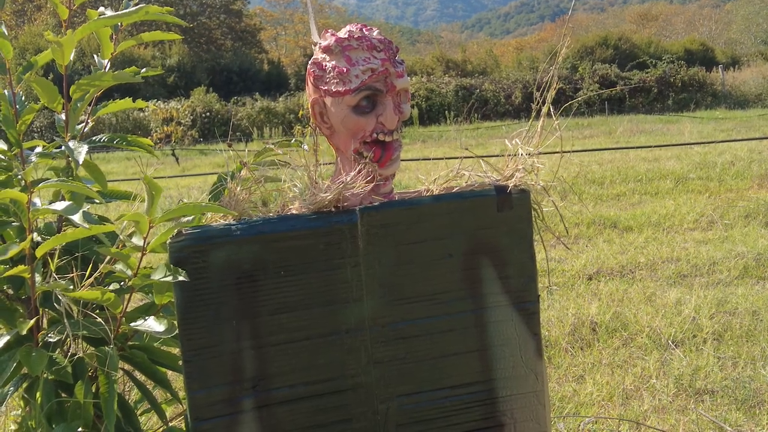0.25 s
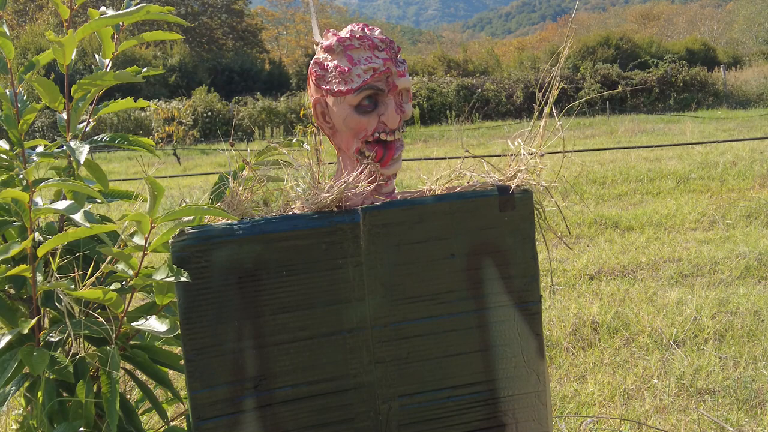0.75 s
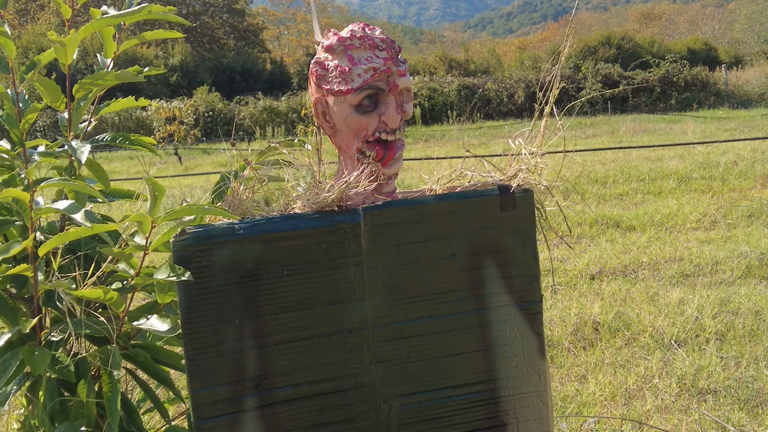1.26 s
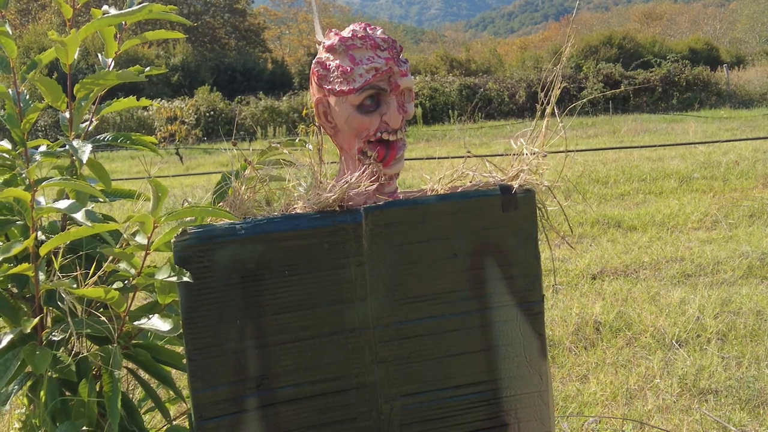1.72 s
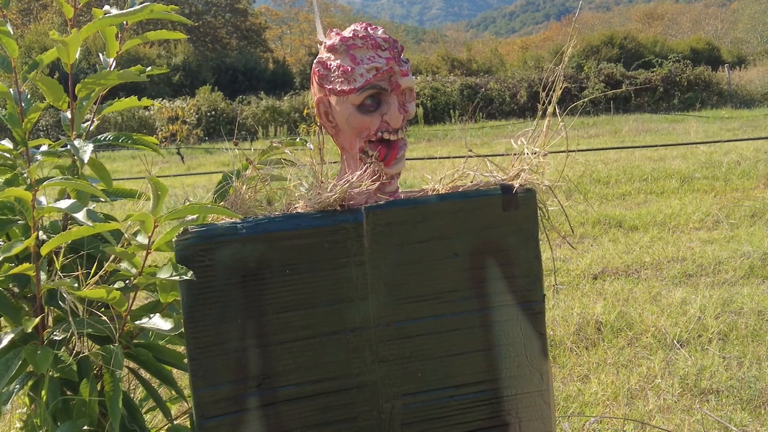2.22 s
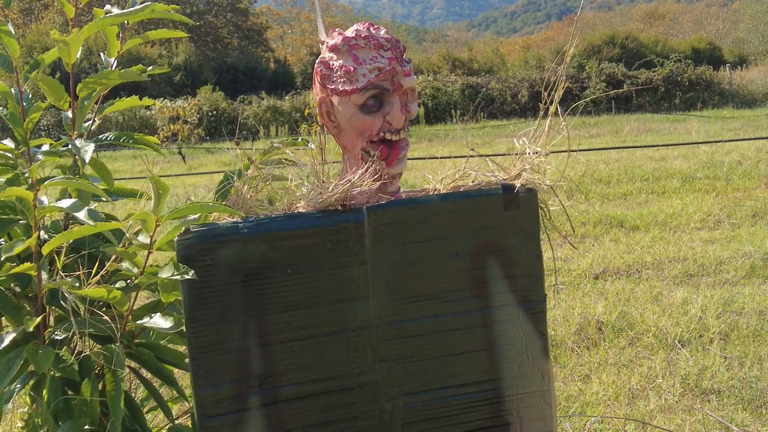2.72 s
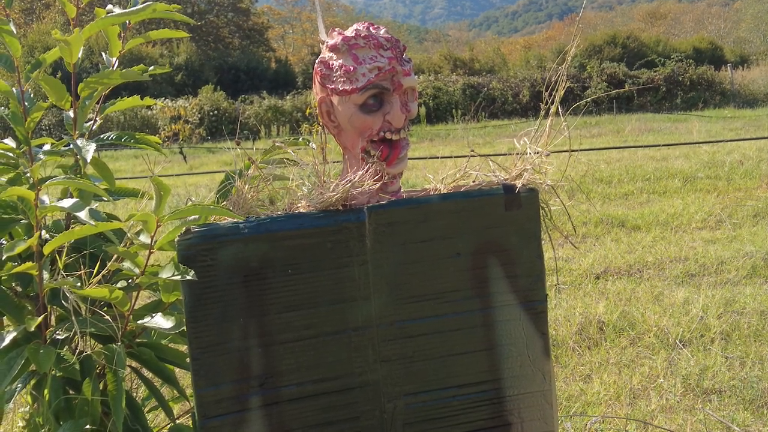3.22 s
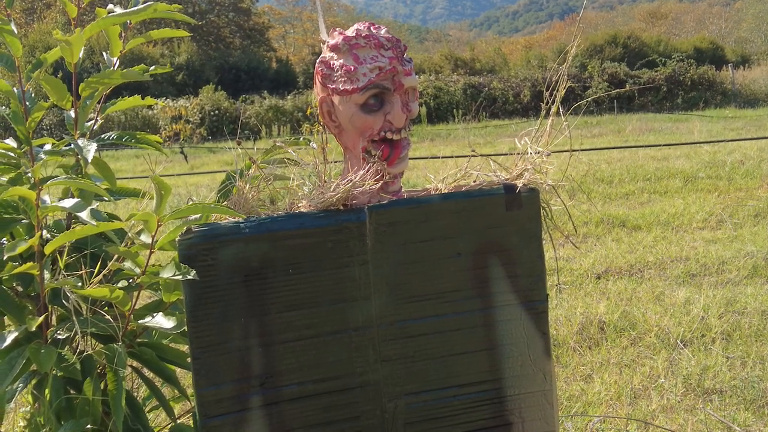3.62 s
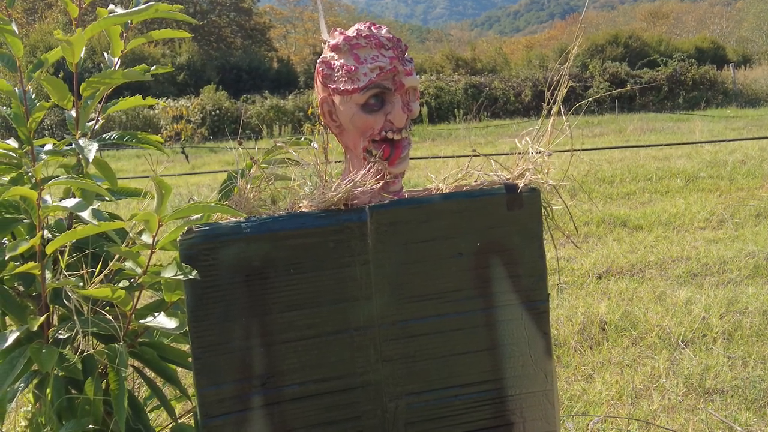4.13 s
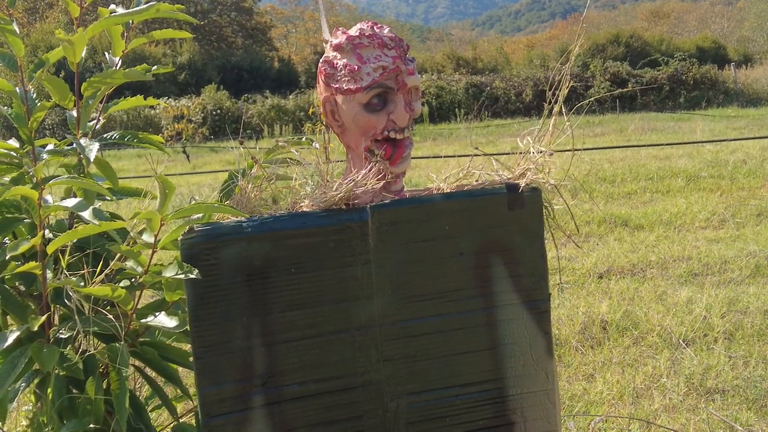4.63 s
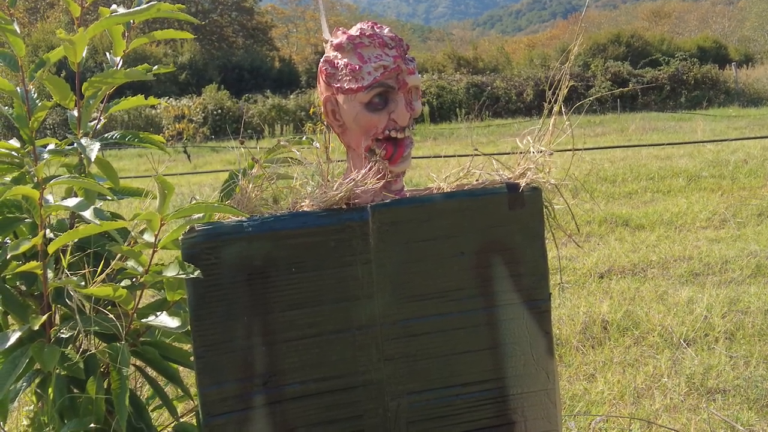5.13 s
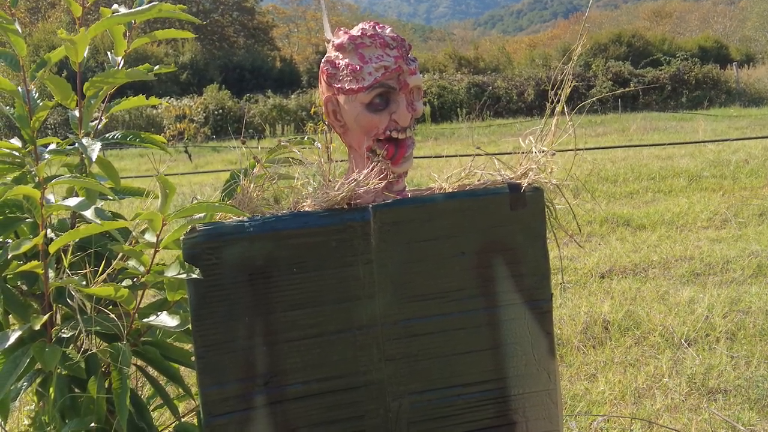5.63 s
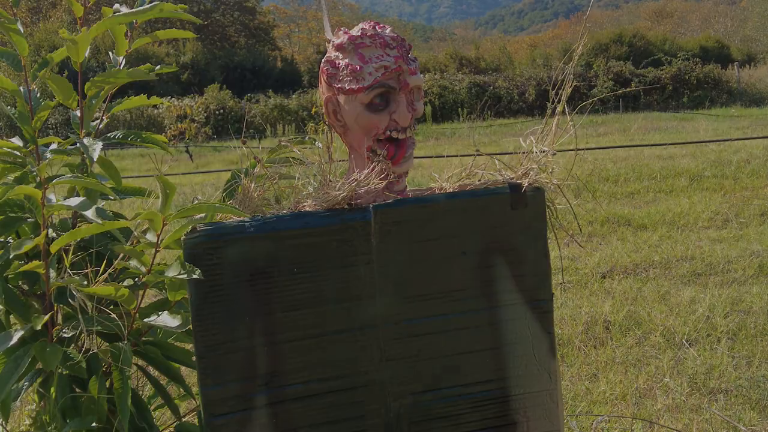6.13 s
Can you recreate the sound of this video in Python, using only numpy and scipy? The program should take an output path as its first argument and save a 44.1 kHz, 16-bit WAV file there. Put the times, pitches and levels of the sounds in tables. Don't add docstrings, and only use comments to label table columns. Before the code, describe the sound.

Close to the microphone, a gas air pistol fires five clipped, hard cracks a little over a second apart. Each is followed almost at once by a pellet snapping on a board, then a bright hedge echo and a duller hillside echo. Small metallic trigger clicks come about two thirds of a second after each blast. Gas buffets the right side after the first and last shots. Faint breeze, leaves and distant machine hum fade out at the end.

```python
import sys
import numpy as np
from scipy import signal
from scipy.fft import rfft, irfft
from scipy.io import wavfile
from scipy.ndimage import uniform_filter1d

SR = 44100
rng = np.random.default_rng(int(sys.argv[2]) if len(sys.argv) > 2 else 0)


def materialize(psi):
    bounded = np.clip(np.atleast_2d(psi).T, -1, 1)
    quanta = np.round(bounded * 32767).astype(np.int16)
    wavfile.write(sys.argv[1], SR, quanta)


def attenuation_scalar(level_db):
    decades = np.asarray(level_db, float) / 20
    return 10 ** decades


N = 280476

# (time [s], gas push length [ms], lead of the smear ahead of the front [s])
SHOT_TIMES = [
    (.1031, 2.0, .025),
    (1.4487, 1.8, .03),
    (2.6106, 1.95, .036),
    (3.7669, 1.95, .041),
    (5.1055, 2.0, .034),
]
# (frequency [Hz], density [dB per Hz])
JET_SPECTRUM = [(350, -32.5), (600, -3.5), (803, -4.5), (1100, 1), (2090, -18), (2400, -12.5), (3000, 2.5),
                (3790, -7.5), (5150, 7), (7280, -11), (9340, -4.5), (10600, -13), (13800, -3), (15300, -7),
                (16300, -32)]


def evened(x):
    return x / np.sqrt(np.mean(x ** 2) + 1e-20)


def read(points, hz):
    f, value = np.transpose(points)
    return np.interp(np.log(hz + 1), np.log(f + 1), value)


def add(mix, s, sound):
    part = mix[:, round(s * SR):][:, :sound.shape[-1]]
    part += sound[..., :part.shape[1]]


def resonate(x, hz, width):
    b, a = signal.iirpeak(hz, hz / width, SR)
    return signal.lfilter(b, a, x)


def alike(a, b, same):
    same = np.clip(same, -1, 1)
    return np.array([a, same * a + np.sqrt(1 - same ** 2) * b])


def pair(size, same):
    a, b = rng.standard_normal((2, size))
    return alike(a, b, same)


def coloured(x, spectrum):
    hz = np.fft.rfftfreq(x.shape[1], 1 / SR)
    return evened(irfft(rfft(x) * attenuation_scalar(read(spectrum, hz)), x.shape[1]))


def swells(rows, t):
    s, db, rise, t60 = np.transpose(rows)[:, :, None]
    steps = t[::32]
    rising = 30 * np.maximum(s - steps, 0) / rise
    dying = 60 * np.maximum(steps - s, 0) / t60
    power = attenuation_scalar(db - rising - dying) ** 2
    return np.interp(t, steps, np.sqrt(power.sum(0)))


def air_hiss():
    # (frequency [Hz], density [dB per Hz])
    air_spectrum = [(65, -26.5), (110, -6), (229, -10), (289, -12.5), (363, -9.5), (519, -11.5), (564, -13),
                    (877, -10), (933, -9.5), (1330, -7.5), (1790, -12), (2720, -18.5), (8440, -21),
                    (14200, -21), (16500, -21)]
    # (frequency [Hz], left-right likeness [-])
    likeness = [(60, 0.71), (130, -1.6), (290, 0.96), (640, -1.4), (1410, 0.12), (3100, 0.95), (6820, -0.4),
                (15000, 0.32)]
    hz = np.fft.rfftfreq(N, 1 / SR)
    a, b = rfft(rng.standard_normal((2, N)))
    both = alike(a, b, read(likeness, hz))
    return attenuation_scalar(-68) * evened(irfft(both * attenuation_scalar(read(air_spectrum, hz)), N))


def far_machine():
    # (centre [Hz], width [Hz], level [dB])
    hum = (572, 9, -76)
    # (centre [Hz], width [Hz], level [dB])
    drone = (79, 14, -65.5)
    hz, width, db = drone
    low = resonate(resonate(pair(N, same=1.0), hz, width), hz, width)
    out = attenuation_scalar(hum[2]) * evened(resonate(pair(N, same=0.17), *hum[:2]))
    out += attenuation_scalar(db) * evened(low)
    out += attenuation_scalar(db + 3.0) * evened(resonate(pair(N, same=0.96), hz / 2, width))
    return out


def leaves(t):
    # (peak time [s], level [dB], rise [s], t60 [s])
    rustle = [
        (.42, -67, .2, 6.3),
        (1.8, -73, .8, 3),
        (5.45, -67.5, .3, 6),
    ]
    lumps = evened(uniform_filter1d(rng.standard_normal(N), 900))
    rub = resonate(resonate(pair(N, same=0.49), 550, 700), 460, 900)
    calm_db = -82.5
    return np.hypot(attenuation_scalar(calm_db), swells(rustle, t)) * attenuation_scalar(2.2 * lumps) * evened(rub)


def breeze(t):
    # (frequency [Hz], density [dB per Hz])
    rumble = [(7.1, -37.5), (12, 1.5), (27, 3), (43, -3), (60, -15), (87, -13), (102, -22), (129, -24.5),
              (200, -28.5), (260, -62.5), (440, -120)]
    # (peak time [s], level [dB], rise [s], t60 [s])
    gusts = [
        (.14, -35.5, .1, 0.13),
        (.35, -47, .2, 1.63),
        (1.45, -48, .15, .6),
        (1.66, -52, .2, 5),
        (2.36, -52.5, .3, 3.4),
        (2.68, -49, .15, 3),
        (5.15, -40.5, .2, .8),
        (5.24, -36, .08, .25),
    ]
    calm_db = -57
    return np.hypot(attenuation_scalar(calm_db), swells(gusts, t)) * coloured(pair(N, same=1.0), rumble)


def ducking(t):
    # (gain change [dB], hold [s])
    duck = (-2.2, 0.059)
    since = t - np.array(SHOT_TIMES)[:, :1]
    held = (since > 0) * np.clip(2 - since / duck[1], 0, 1)
    return attenuation_scalar(duck[0] * held.sum(0))


def field():
    t = np.arange(N) / SR
    return (air_hiss() + leaves(t) + far_machine()) * ducking(t) + breeze(t)


def echoes():
    # (frequency [Hz], density [dB per Hz])
    hedge_spectrum = [(410, -50.5), (700, -20), (1170, -17.5), (1810, -9), (2460, -4.5), (3700, -9),
                      (4170, 0.5), (4460, -3.5), (5810, -3), (6890, -12.5), (7560, -5), (9400, -7),
                      (10400, -14), (15200, -14), (16500, -33)]
    # (frequency [Hz], density [dB per Hz])
    slope_spectrum = [(290, -40), (500, -20.5), (745, -7.5), (959, -13), (1140, -7), (1270, 0), (1450, -4),
                      (2470, -4), (2670, -8.5), (3010, -2.5), (3770, -7.5), (5400, -8.5), (6960, -19.5),
                      (7840, -16.5), (12000, -27), (15600, -55.5), (22000, -120)]
    # (delay after the shot [s], level [dB], rise [s], t60 [s])
    hedge_returns = [(.004, -41, .003, 0.17), (.05, -56, .03, 1.2), (.09, -54, .02, .12),
                     (.149, -40.5, .03, .065), (.175, -52.5, .06, .4), (.292, -65.5, 0.017, 1)]
    # (delay after the shot [s], level [dB], rise [s], t60 [s])
    slope_returns = [(.03, -70, 0.033, 0.33), (.163, -52.5, 0.052, 0.74), (.292, -52, 0.034, 1.16),
                     (.55, -65, 0.26, 2.7)]
    # (hedge level [dB], slope level [dB])
    shot_levels = [(-6, 1.5), (0, 0.5), (-0.5, -1.5), (1, -2), (-6, -2)]
    t = np.arange(0, 1.1, 1 / SR)
    out = np.zeros((2, N))
    for row, (near_db, far_db) in zip(SHOT_TIMES, shot_levels):
        grain = evened(uniform_filter1d(rng.standard_normal((2, len(t))), 90))
        stems = (rng.random(len(t)) < 45 / SR) * rng.exponential(1, len(t))
        stems = uniform_filter1d(stems, 60) * 60
        near_db = near_db + 1.3 * np.minimum(stems, 2.5)
        hedge = swells(hedge_returns, t) * attenuation_scalar(near_db + 2.8 * grain[0])
        hedge = hedge * coloured(pair(len(t), same=0.23), hedge_spectrum)
        slope = swells(slope_returns, t) * attenuation_scalar(far_db + 1.6 * grain[1])
        slope = slope * coloured(pair(len(t), same=0.3), slope_spectrum)
        add(out, row[0], (hedge + slope) * (t > .003))
    return out


def thud(db, hz, t60):
    t = np.arange(0, .1, 1 / SR)
    return attenuation_scalar(db - 60 * t / t60) * np.clip(t / 0.013, 0, 1) * np.sin(2 * np.pi * hz * t)


def add_thuds(mix):
    # (time [s], peak [dB], pitch [Hz], t60 [s])
    thuds = [
        (.578, -44, 422, 0.057),
        (1.594, -44, 130, 0.097),
        (1.594, -27.5, 360, 0.019),
        (2.755, -46.5, 212, 0.055),
        (3.912, -47, 261, 0.035),
        (5.51, -55.5, 225, 0.12),
        (5.77, -45, 197, 0.056),
    ]
    for s, *settings in thuds:
        add(mix, s, thud(*settings))


def click(db, bright_db, t60, bounce, rise):
    # (centre [Hz], width [Hz], level [dB])
    steel = [(1570, 1600, 2), (2350, 680, 0.5), (3070, 230, 8), (4050, 570, 0.5)]
    # (centre [Hz], width [Hz], level [dB])
    small_parts = [(6250, 1700, 0), (7470, 360, 5), (8880, 690, 6), (13000, 1600, -1)]
    t = np.arange(0, .08, 1 / SR)
    knock = attenuation_scalar(-60 * t / 0.0084)
    rattle = knock + bounce * np.roll(knock, 175) + attenuation_scalar(-8 - 60 * t / t60)
    drive = pair(len(t), same=0.71) * rattle * np.clip(t / rise, 0, 1)
    frame = sum(attenuation_scalar(level) * resonate(drive, hz, width) for hz, width, level in steel)
    no_bass = signal.butter(4, 1450, "high", fs=SR, output="sos")
    frame = signal.sosfilt(no_bass, frame)
    frame += 11.0 * bounce * resonate(drive, 2870, 130)
    parts = sum(attenuation_scalar(level) * resonate(drive, hz, width) for hz, width, level in small_parts)

    def by_attack(x):
        return x / np.sqrt(np.mean(x[:, :130] ** 2))

    return attenuation_scalar(db) * (by_attack(frame) + attenuation_scalar(bright_db) * by_attack(parts))


def add_trigger_parts(mix):
    # (time [s], peak [dB])
    ticks = [(.6888, -57), (.9433, -57), (1.9574, -55), (1.9779, -61), (2.1665, -57), (3.1083, -54),
             (3.3209, -59.5), (4.2597, -54.5), (4.4842, -58), (5.8022, -59), (5.8272, -56), (6.0132, -63)]
    springs = [(.7462, -49.5), (2.0023, -51), (3.1338, -58), (4.2857, -54), (4.3091, -49.5),
               (5.8506, -50.5)]
    pawls = [(.7594, -51), (2.0118, -48.5), (3.1474, -57), (4.3244, -56), (5.8611, -47.5)]
    sears = [(.7806, -40), (2.0333, -37.5), (3.1712, -40), (4.3395, -57), (4.3487, -53), (5.881, -39)]
    latches = [(.829, -33), (2.0872, -43.5), (3.225, -33.5), (4.389, -33), (5.9389, -33.5)]
    # (bright share [dB], t60 [s], bounce share [-], rise [s])
    tick_voice = (-20, .024, 0.24, .001)
    spring_voice = (-3.5, 0.063, 0.15, .0015)
    pawl_voice = (-13, 0.1, 0.16, .002)
    sear_voice = (6, .045, .08, .0002)
    latch_voice = (-12, 0.053, .35, .0001)
    for events, voice in ((ticks, tick_voice), (springs, spring_voice), (pawls, pawl_voice),
                          (sears, sear_voice), (latches, latch_voice)):
        for s, db in events:
            add(mix, s, click(db, *voice))


def spike(t, ms):
    u = np.maximum(t, 0) * 1000 / ms
    return -2 * np.e * u * (1 - u / 2) * np.exp(-u)


def strike(db, knock_db):
    # (frequency [Hz], level [dB], t60 [s])
    board = [(500, -7.5, 0.03), (950, -7.5, 0.0045), (2490, -14, .01), (5400, -4.5, 0.0027),
             (7800, 4.5, 0.0024)]
    t = np.arange(0, .06, 1 / SR)
    rings = []
    for hz, level, t60 in board:
        hz = hz * rng.uniform(0.76, 1.5)
        rings.append(attenuation_scalar(level - 60 * t / t60) * np.sin(2 * np.pi * hz * t))
    direct = .6 * spike(t, 0.091) - 1.5 * sum(rings[2:]) - attenuation_scalar(knock_db) * sum(rings[:2])
    softened = uniform_filter1d(direct, 14)
    bounced = direct + sum(.4 ** k * np.roll(softened, 180 * k) for k in range(1, 5))
    splat = attenuation_scalar(-5 - 60 * t / .006)
    scatter = attenuation_scalar(-20 - 60 * t / 0.013)
    debris = (splat + scatter) * coloured(pair(len(t), same=0.58), JET_SPECTRUM)
    shudder = evened(resonate(pair(len(t), same=.9), 450, 730))
    debris += attenuation_scalar(knock_db - 10 - 60 * t / .075) * shudder
    return attenuation_scalar(db) * (bounced + debris)


def add_strikes(mix):
    # (time [s], peak [dB], knock under the snap [dB])
    strikes = [
        (.1284, -22.5, -3),
        (1.4737, -15.5, -9),
        (2.6368, -20, -4.5),
        (3.7933, -21.5, -8),
        (5.1314, -17, -6),
    ]
    for s, *settings in strikes:
        add(mix, s, strike(*settings))


def spent_gas():
    # (time [s], half length [s], left pressure [full scale], right pressure [full scale])
    eddies = [(0.137, 0.028, -0.032, -0.18), (0.183, 0.069, -.005, -.09), (.205, .02, 0.0063, -0.095),
              (.233, 0.012, 0, .14), (0.263, .016, 0, 0.32), (0.281, 0.0095, -0.0028, -0.092),
              (5.129, 0.046, -0.035, -0.12), (5.222, 0.11, -0.034, -0.084), (5.258, 0.033, 0.013, -0.073),
              (5.301, 0.044, .02, 0.24), (5.35, 0.065, 0.073, 0.085)]
    # (start [s], end [s], level [dB])
    flutters = [
        (.13, 0.299, -43.5),
        (5.135, 5.398, -42.5),
    ]
    out = np.zeros((2, N))
    for s, half, left, right in eddies:
        add(out, s - half, np.outer([left, right], np.hanning(round(2 * half * SR))))
    for start, end, db in flutters:
        passing = signal.windows.tukey(round((end - start) * SR), .15)
        flutter = resonate(resonate(rng.standard_normal(SR // 2), 51, 60), 51, 60)
        flutter = evened(flutter)[-len(passing):]
        add(out, start, np.outer([.15, 1], attenuation_scalar(db) * passing * flutter))
    return out


def jet_noise(t, push, crack_db, swirl_db):
    jet = attenuation_scalar(-60 * t / .012) + attenuation_scalar(-7 - 60 * t / .04)
    jet = jet * (1 - .6 * push)
    ahead = attenuation_scalar(-20 + 60 * t / 0.03)
    noise = coloured(pair(len(t), same=0.48), JET_SPECTRUM)
    hiss = attenuation_scalar(crack_db) * np.where(t > 0, jet, ahead) * noise
    hiss *= attenuation_scalar(2.5 * evened(uniform_filter1d(rng.standard_normal(len(t)), 50)))
    swirl = evened(resonate(pair(len(t), same=0.81), 1700, 1200))
    return hiss + attenuation_scalar(swirl_db - 60 * abs(t) / 0.025) * (t > 0) * swirl


def early_smear(t, lead, hz, thin_db, dull_db):
    tone = attenuation_scalar(thin_db) * np.sin(2 * np.pi * hz * t)
    tone = tone * np.clip((t + lead) / 0.0039, 0, 1) * (t < 0) * attenuation_scalar(60 * t / 0.4)
    band = signal.butter(4, [300, 1250], "band", fs=SR, output="sos")
    dull = signal.sosfiltfilt(band, rng.standard_normal(len(t)))
    return tone + attenuation_scalar(dull_db + 60 * t / 0.07) * evened(dull) * (t < 0) * (t > -lead)


def shot(ms, lead, crack_db, swirl_db, smear_hz, smear_db, dull_db, left, right):
    push_l, swing_l, damp_l = left
    push_r, swell_r, swing_r, half, damp_r = right
    t = np.arange(-.045, .16, 1 / SR)
    end = t - ms / 1000
    u = np.maximum(end, 0) * 1000
    after = np.clip(u / .12, 0, 1)
    push = np.clip((t - .0004) / .0004, 0, 1) * (1 - after)
    fronts = .3 * spike(t, 0.026) + .36 * spike(t - .0003, 0.012) + .15 * spike(end, 0.15)
    hiss = jet_noise(t, push, crack_db, swirl_db)
    smear = early_smear(t, lead, smear_hz, smear_db, dull_db)
    ramp = np.sin(np.pi * np.clip(1 + t / .03, 0, 1) / 2)
    swell = 1.2 * ramp ** 6 - .2 * ramp

    left_capsule = push_l * push
    left_capsule += swing_l * after * np.exp(-u / damp_l) * np.cos(np.pi * u / 36)
    left_capsule += .2 * abs(swell_r) * swell ** 4 * (t < 0) + .07 * smear

    sag = 1 - .6 * np.clip(t / ms * 1000, 0, 1) ** 2
    phase = np.pi * u / half + 1.2 * (swing_r > 0)
    right_capsule = push_r * push * sag
    right_capsule += swing_r * .96 * after * np.exp(-u / damp_r) * np.sin(phase)
    right_capsule += swell_r * swell * np.exp(-u / 1.8) + smear
    right_capsule -= .55 * after * np.exp(-u / .7) * np.cos(2 * np.pi * u / 1.1)
    return np.array([left_capsule, right_capsule]) + fronts + hiss


def add_shots(mix):
    # (crack [dB], swirl [dB], thin smear pitch [Hz], thin smear [dB], dull smear [dB])
    blasts = [(-14, -22, 730, -46, -30), (-13, -23.5, 1150, -43, -32), (-14.5, -23, 1200, -37.5, -32.5),
              (-15, -23.5, 1200, -39, -32), (-16.5, -13.5, 1220, -36, -28.5)]
    # (push [full scale], swing after it [full scale], damping [ms])
    left_rows = [(-.1, .22, 10), (.88, -.2, 9), (1.15, -.56, 11), (.8, -.54, 9), (1.0, .22, 7)]
    # (push [full scale], swell ahead [full scale], swing [full scale],
    # half period [ms], damping [ms])
    right_rows = [(-.35, -.14, 1.2, 22, 13), (.35, .45, -1.3, 19, 11), (.3, .33, -2.7, 17.5, 7),
                  (.15, .25, -3.1, 15.5, 4.6), (.7, .22, .95, 21, 8)]
    for (s, *timing), blast, left, right in zip(SHOT_TIMES, blasts, left_rows, right_rows):
        add(mix, s - .045, shot(*timing, *blast, left, right))


def scene():
    near = spent_gas()
    add_thuds(near)
    add_trigger_parts(near)
    add_strikes(near)
    add_shots(near)
    near = np.array([np.roll(near[0], 2), near[1]])
    return near + field() + echoes()


def top_cut(x):
    return signal.sosfilt(signal.butter(12, 16770, fs=SR, output="sos"), x)


def record(dry):
    # (start [s], curve [dB per s squared])
    fade = (5.792, -43)
    clipped = np.clip(dry, -.99, .99)
    low_pass = signal.firwin(255, 16150, fs=SR)[None]
    fade_db = fade[1] * np.maximum(np.arange(N) / SR - fade[0], 0) ** 2
    mix = signal.oaconvolve(clipped, low_pass, "same") * attenuation_scalar(fade_db)
    return top_cut(mix)


dry = scene()
out = record(dry)
materialize(out)
```